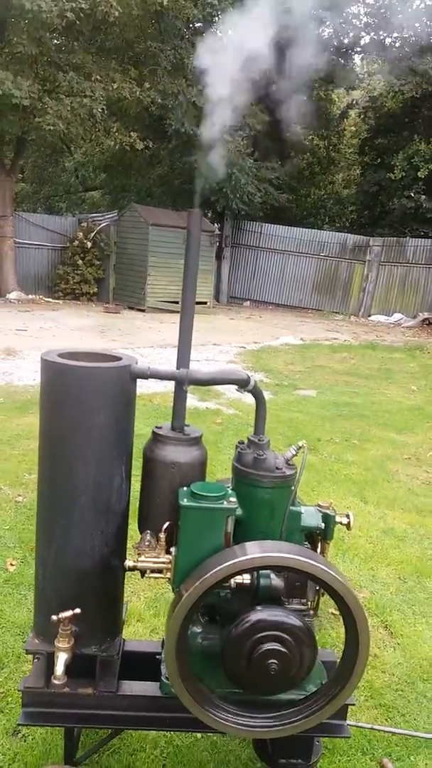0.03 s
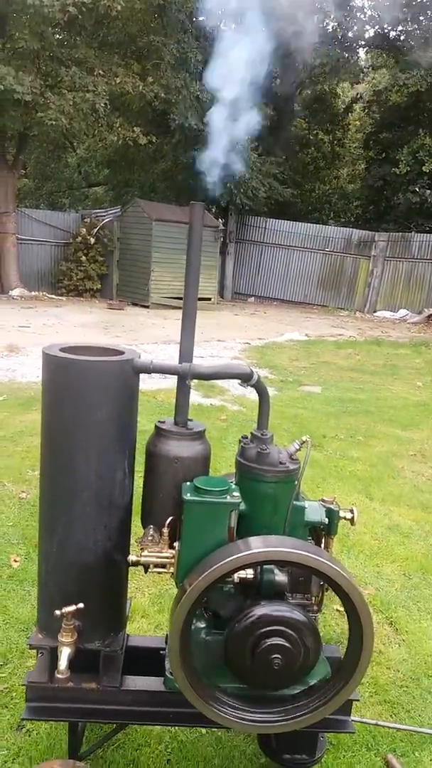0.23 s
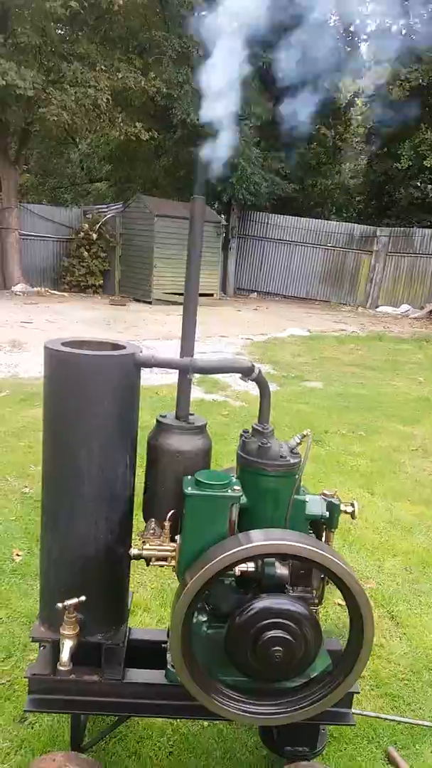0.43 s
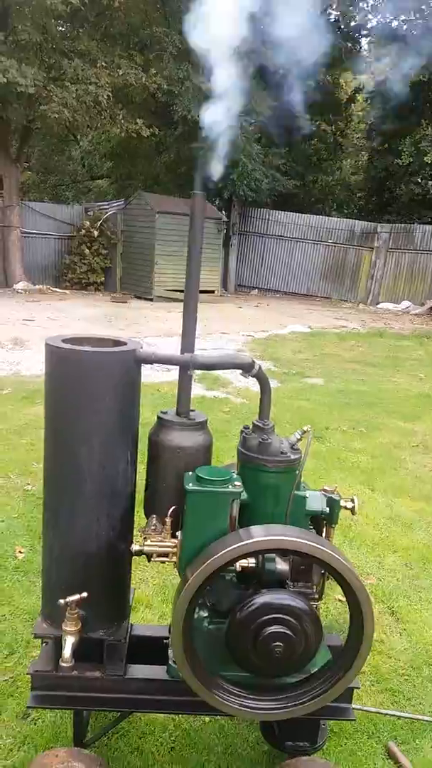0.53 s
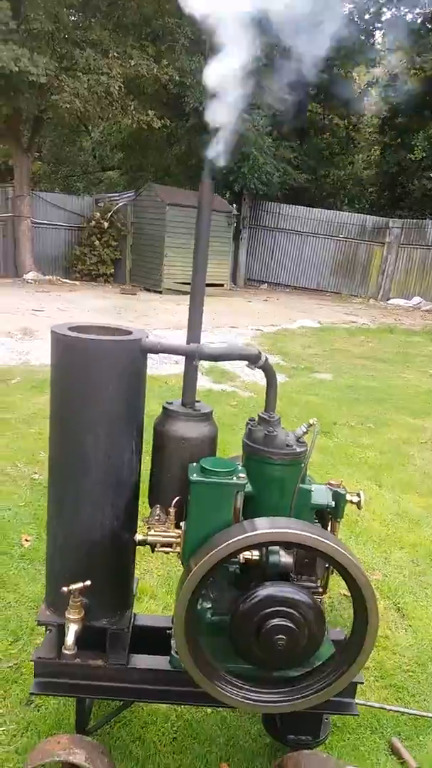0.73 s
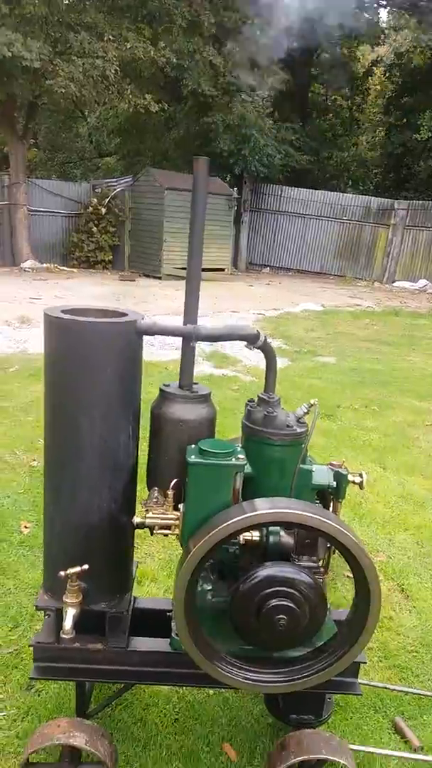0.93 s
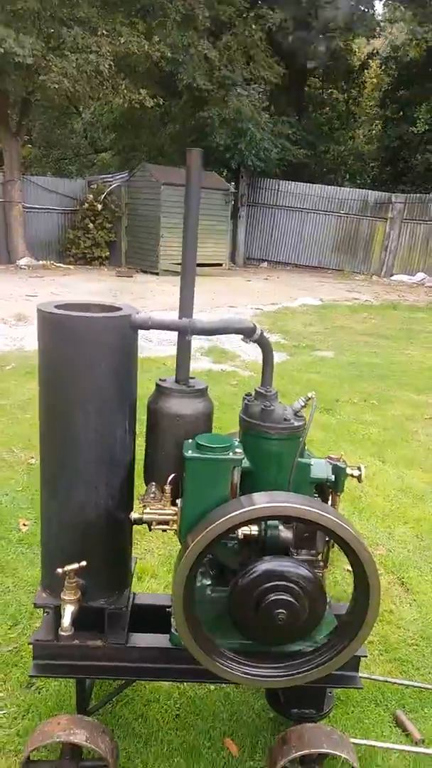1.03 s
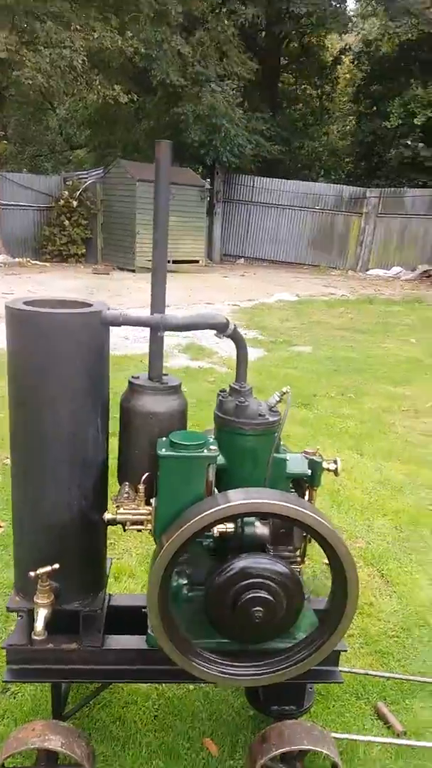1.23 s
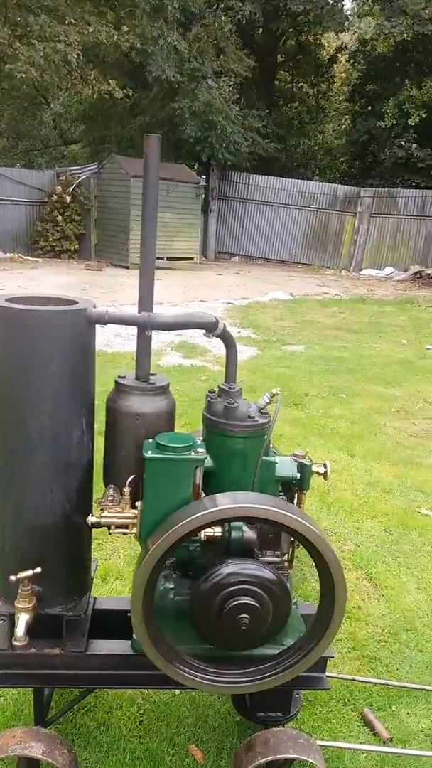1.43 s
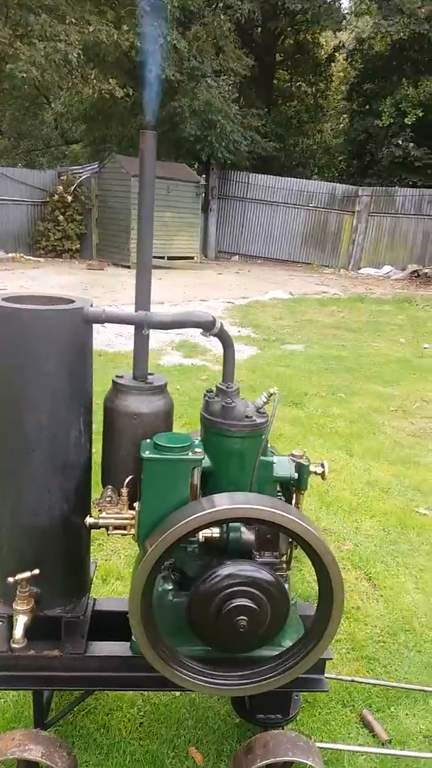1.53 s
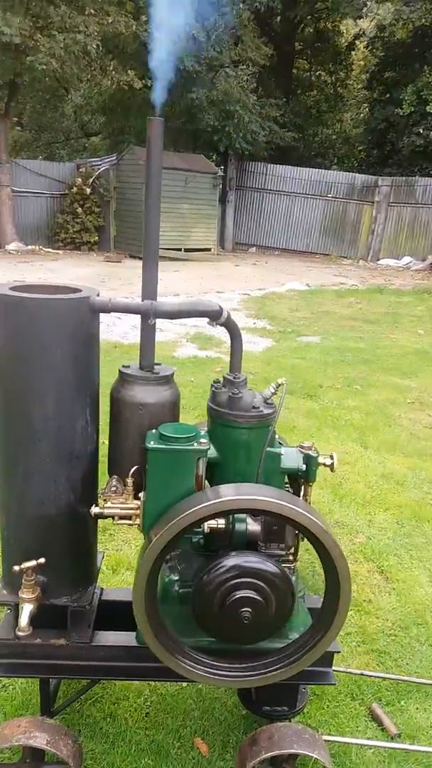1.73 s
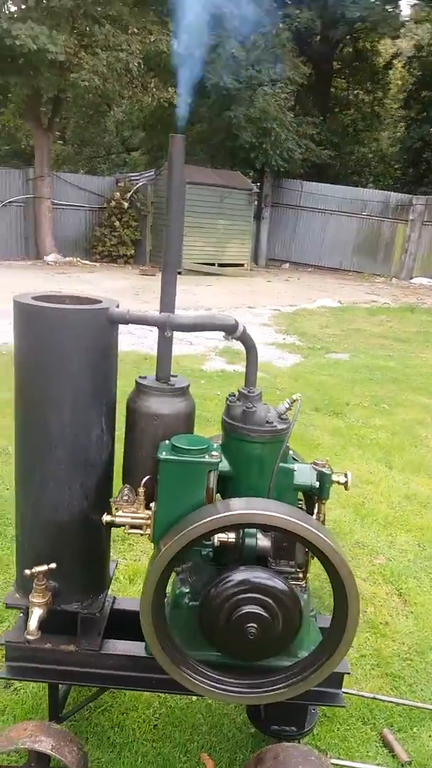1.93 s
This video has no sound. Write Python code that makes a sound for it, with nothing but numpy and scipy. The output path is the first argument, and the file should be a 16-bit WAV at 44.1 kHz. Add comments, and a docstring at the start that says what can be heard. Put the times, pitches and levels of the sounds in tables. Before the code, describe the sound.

A small old stationary engine runs outdoors, popping steadily about ten times a second with breathy intake hiss, iron knocks and low rumble. Sharp hissing exhaust chuffs come at 0.27 and 0.37 seconds. Around 1.0 a rough blast swells into a loud, clipped boom with a short yard echo. Afterwards everything is quieter; firings thud and whistle near 1.2, 1.4, 1.7, 1.8 and 1.9.

```python
"""A small two-stroke stationary engine idles on a lawn at about ten turns a second.
From the first turn, pressure pulses pop, shaped noise sucks at the intake and ringing noise rattles the iron.
Some turns then fire: low modes thud, a gliding tone sounds the stack, and rough noise chuffs and whistles.
Just before one second, unburnt fuel goes off in the silencer: a noise swell, a ringing boom, a yard echo.
After the bang the recorder's gain control stays turned down."""
import sys
import numpy as np
from scipy import signal
from scipy.fft import rfft, irfft
from scipy.io import wavfile
from scipy.ndimage import uniform_filter1d

SR = 44100
rng = np.random.default_rng(int(sys.argv[2]) if len(sys.argv) > 2 else 0)


def pcm_store(signal):
    """Save signal as 16-bit PCM."""
    levels = np.round(np.clip(np.atleast_2d(signal), -1, 1) * 32767)
    wavfile.write(sys.argv[1], SR, levels.astype(np.int16).T)


N = 88200
T = np.arange(N) / SR

# Turns of the crank: [t/s, intake pop level/dB]
TURNS = [(.0193,-14),(0.1208,-17.5),(.2221,-13),(.3227,-14.5),(.422,-14),(.522,-11.5),(0.6232,-14),(0.7242,-11.5),(0.8266,-10.5),(.9291,-10),
         (1.0267,-7),(1.1418,-11.5),(1.2389,-9.5),(1.3429,-10),(1.4504,-26),(1.5508,-13),(1.6549,-12.5),(1.7633,-10.5),(1.862,-10.5),(1.962,-10.5)]
# Pressure pulses within one turn: [t/s from the turn, f/Hz, level/dB relative to the turn's pop]
INTAKE_PULSES = [(-.008,424,-4),(0,620,3.3),(0.0263,450,-8)]
# Colour of the air drawn in: [f/Hz, relative level/dB]
INTAKE_HISS_COLOUR = [(200,2),(1000,3),(2000,-6.5),(3000,1),(4200,-6),(5400,-1),(7000,-8.5),(10000,-15),(16000,-24.5)]
THUMP_HZ, THUMP_DB = 96, -19.5  # level relative to the turn's pop
HISS_DB, HISS_LEAD_S = -25.5, 0.0086
HISS_RISE_S, HISS_HOLD_S, HISS_DECAY_S = 0.0092, 0.0086, 0.006


def intake():
    """Pressure pulses, each with a low thump, pop on every turn as air hisses through the carburettor."""
    pops, draw = np.zeros(N), np.zeros(N)
    for turn_s, pop_db in TURNS:
        for delay, hz, db in INTAKE_PULSES:
            at = turn_s + delay
            pop = amp(db) * pulse(at, hz)
            thump = amp(THUMP_DB) * pulse(at, THUMP_HZ)
            pops += amp(pop_db) * (pop + thump)
        draw += amp(HISS_DB) * burst(turn_s - HISS_LEAD_S, HISS_RISE_S, HISS_HOLD_S, HISS_DECAY_S)
    return pops + draw * noise(INTAKE_HISS_COLOUR)


# Firings: [t/s, thud level/dB, gas level/dB, hot pipe tone f/Hz, pipe tone level/dB,
#           after-ring level/dB, top hiss level/dB relative to the gas]
FIRINGS = [(0.2694,-10.5,-17.5,1140,-40,-22,14),(0.3697,-12,-14.5,1077,-22,-29,6.5),(0.981,-16.5,-19,960,-30,-45,-11),(1.1857,-13.5,-18,1467,-14,-33,-3),(1.3946,-7,-10,1163,-15.5,-31,-23),
           (1.415,-13,-25,1290,-17.5,-46,-18),(1.7072,-6.5,-13.5,1086,-13,-50,-3),(1.809,-12.5,-19,1130,-16.5,-32,-15),(1.910,-12.5,-18,1183,-12.5,-28,-5)]
# Colour of the escaping gas: [f/Hz, relative level/dB]
GAS_COLOUR = [(500,-16),(3700,-6.5),(4800,-3),(5700,4),(6600,-3),(8000,-12.5),(11000,-19.5),(16000,-34)]
# Colour of the fuller rush of gas, also used in the boom: [f/Hz, relative level/dB]
RUSH_COLOUR = [(60,0.5),(150,4),(650,1.5),(1000,-2),(2400,-3),(3500,-7.5),(8000,-25)]
# Ringing of the stack, also excited by the backfire: [f/Hz, t60/s, relative level/dB]
STACK_MODES = [(2535,0.2,-20),(2947,0.3,-25),(4870,0.05,-16.5),(6930,0.05,-15)]
EXHAUST_LAG_S, IDLE_PUFF_DB = 0.044, -27.5
GAS_RISE_S, GAS_HOLD_S, GAS_DECAY_S = 0.0028, 0.0064, 0.0056
RUSH_DB, RUSH_DECAY_S = -21.5, 0.011
AFTER_HZ, AFTER_LAG_S, AFTER_DECAY_S = 1880, 0.009, 0.008
TOP_HISS_HZ = 9000


def exhaust():
    """Each firing thuds, sounds the pipe, sputters out gas and leaves a ring; every turn pumps a soft puff."""
    low = sum(amp(IDLE_PUFF_DB) * thud(turn_s + EXHAUST_LAG_S) for turn_s, _ in TURNS)
    gas, rush, jet = noise(GAS_COLOUR), noise(RUSH_COLOUR), np.zeros(N)
    high_pass = signal.butter(4, TOP_HISS_HZ, "high", fs=SR, output="sos")
    top = signal.sosfilt(high_pass, noise(GAS_COLOUR))
    for at, thud_db, gas_db, hot_hz, tone_db, after_db, top_db in FIRINGS:
        low += amp(thud_db) * thud(at)
        low += amp(tone_db) * pipe_tone(at, hot_hz)
        # one lag sets the delay, rise and hold of the after-ring
        after_swell = burst(at + AFTER_LAG_S, AFTER_LAG_S, AFTER_LAG_S, AFTER_DECAY_S)
        low += amp(after_db) * after_swell * tone(AFTER_HZ)
        gas_swell = burst(at, GAS_RISE_S, GAS_HOLD_S, GAS_DECAY_S)
        jet += amp(gas_db) * (gas + amp(top_db) * top) * gas_swell
        jet += amp(RUSH_DB) * rush * burst(at, GAS_RISE_S, GAS_HOLD_S, RUSH_DECAY_S)
    return low + body(jet * sputter(), STACK_MODES)


# Air in the silencer: [f/Hz, t60/s, relative level/dB]
SILENCER_MODES = [(146,0.028,0),(77,0.039,-6.5)]


def thud(start):
    """A slug of gas rocks the air in the silencer."""
    return sum(amp(db) * ring(hz, t60, start) for hz, t60, db in SILENCER_MODES)


PIPE_COLD_HZ, PIPE_COOL_S, PIPE_OCTAVE_DB, PIPE_DECAY_S = 1022, .04, -10.5, 0.0092


def pipe_tone(at, hot_hz):
    """The stack sounds with its octave, gliding from its hot pitch to the cold one as the gas cools."""
    cooling = np.exp(-np.maximum(T - at, 0) / PIPE_COOL_S)
    hz = PIPE_COLD_HZ + (hot_hz - PIPE_COLD_HZ) * cooling
    swell = burst(at - .002, 0.0025, 0.0058, PIPE_DECAY_S)
    return swell * (tone(hz) + amp(PIPE_OCTAVE_DB) * tone(2 * hz))


# Short whistles at the exhaust port: [t/s, f/Hz, level/dB]
WHISTLES = [(0.268,4935,-15),(0.27,4430,-18),(0.376,4830,-16),(.582,5450,-25.5),(0.683,5450,-22.5),(1.301,5340,-26),(1.395,5620,-11.5),(1.707,6900,-15),(1.814,5430,-11),(1.913,5410,-14)]
WHISTLE_RISE_S, WHISTLE_HOLD_S, WHISTLE_DECAY_S = 0.0048, 0.0013, 0.0047


def whistles():
    """Gas squeezes through the exhaust port with a brief bright ping."""
    pings = np.zeros(N)
    for at, hz, db in WHISTLES:
        pings += amp(db) * burst(at, WHISTLE_RISE_S, WHISTLE_HOLD_S, WHISTLE_DECAY_S) * tone(hz)
    return pings


# Colour of the blast: [f/Hz, relative level/dB]
BANG_COLOUR = [(60,-3),(650,-4),(1000,2),(2500,-4.5),(5300,9.5),(11000,-8.5),(16000,-17)]
# Colour of the bang's echo: [f/Hz, relative level/dB]
ECHO_COLOUR = [(60,-4.5),(1800,-4.5),(5300,0.5),(8000,-8),(16000,-27.5)]
# What the boom sets ringing in the silencer: [f/Hz, t60/s, level/dB relative to the boom]
BOOM_MODES = [(175, .05, -11), (660, .045, -6.5)]
BANG_S, BANG_DB, BANG_RISE_S, BANG_HOLD_S, BANG_DECAY_S = 0.99, -6, 0.017, 0.006, 0.0024
BOOM_S, BOOM_DB = 1.009, -2
ECHO_DB, ECHO_HOLD_S, ECHO_DECAY_S = -7, 0.021, 0.049


def backfire():
    """A rough blast swells in the stack, ends in a boom and scatters back from the fence and trees."""
    swell = burst(BANG_S, BANG_RISE_S, BANG_HOLD_S, BANG_DECAY_S)
    blast = amp(BANG_DB) * noise(BANG_COLOUR) * sputter() * swell
    hollow = sum(amp(db) * ring(hz, t60, BOOM_S) for hz, t60, db in BOOM_MODES)
    slam = noise(RUSH_COLOUR) * burst(BOOM_S, 0.00077, 0.0047, 0.003)
    boom = amp(BOOM_DB) * (slam + hollow)
    first_return = burst(1.014, 0.002, ECHO_HOLD_S, ECHO_DECAY_S)
    late_return = amp(-10.5) * burst(1.05, 0.032, 0.02, 0.017)
    echo = amp(ECHO_DB) * noise(ECHO_COLOUR) * (first_return + late_return)
    return body(blast + boom + echo, STACK_MODES)


# Knocks of loose metal: [t/s, level/dB]
KNOCKS = [(.044,-29.5),(0.063,-22),(0.148,-27.5),(.166,-26),(0.186,-20.5),(0.247,-25),(0.452,-25.5),(0.472,-23),(0.489,-25),(0.574,-26),(.586,-24.5),
          (.672,-20.5),(.686,-21),(.754,-25),(.772,-28),(0.79,-22.5),(0.857,-22.5),(0.879,-24),(0.895,-24),(1.304,-24),(1.583,-27)]
# Colour of contact on the iron: [f/Hz, relative level/dB]
IRON_COLOUR = [(150,3.5),(600,-8.5),(1150,6.5),(1900,-8.5),(3000,1),(4100,-8),(5600,3),(6400,-10),(7500,-24),(16000,-40)]
# Ringing of the iron casing: [f/Hz, t60/s, relative level/dB]
IRON_MODES = [(1156,0.094,-17.5),(2838,0.046,-16.5),(5476,0.03,-19.5)]
KNOCK_RISE_S, KNOCK_HOLD_S, KNOCK_DECAY_S = 0.0004, 0.0017, 0.0039
KNOCK_COLOUR_DB = 2  # random spread of each colour point
CHATTER_DB, CHATTER_SPREAD_DB, CHATTER_PER_S = -35.5, 3, 86


def knocks():
    """Slack moving parts knock the iron casing, each blow its own colour, over random lighter chatter."""
    is_tap = rng.random(N) < CHATTER_PER_S / SR
    taps = is_tap * amp(CHATTER_DB + CHATTER_SPREAD_DB * rng.standard_normal(N))
    tap_shape = burst(0, KNOCK_RISE_S, KNOCK_HOLD_S, KNOCK_DECAY_S)
    contact = through(taps, tap_shape) * noise(IRON_COLOUR)
    for at, db in KNOCKS:
        colour = [(hz, iron_db + KNOCK_COLOUR_DB * rng.standard_normal()) for hz, iron_db in IRON_COLOUR]
        contact += amp(db) * burst(at, KNOCK_RISE_S, KNOCK_HOLD_S, KNOCK_DECAY_S) * noise(colour)
    return body(contact, IRON_MODES)


# Colour of the churning bearings and gears: [f/Hz, relative level/dB]
RUMBLE_COLOUR = [(40,-34),(75,2),(120,7),(260,-12),(1150,2),(1800,-5.5),(5500,-21),(7000,-29),(16000,-41)]
RUMBLE_DB = -34.5


def running_gear():
    """Bearings and gears churn as steady coloured noise."""
    return amp(RUMBLE_DB) * noise(RUMBLE_COLOUR)


# Hard reflection in the yard: [t/s delay, level/dB]
REFLECTIONS = [(.027,-15)]
# Colour of the outdoor tail: [f/Hz, relative level/dB]
YARD_COLOUR = [(100,-4),(9000,-0.5),(16000,-12)]
YARD_DB, YARD_T60_S = -14.5, 0.5


def yard(x):
    """One hard reflection and a thin, decaying noise tail join the direct sound."""
    tail = noise(YARD_COLOUR) * burst(0.0028, 0.0063, 0, YARD_T60_S / np.log(1000))
    response = amp(YARD_DB) * tail / np.linalg.norm(tail)
    for delay, db in REFLECTIONS:
        response[int(delay * SR)] += amp(db)
    return x + through(x, response)


def amp(db):
    """Decibels to gain."""
    return 10 ** (np.asarray(db) / 20)


def unit(x):
    """Scale to a standard deviation of 1."""
    return x / np.std(x)


def noise(colour):
    """Noise of rms 1 with a spectrum of (f/Hz, level/dB) points joined over log frequency."""
    hz, db = np.array(colour, float).T
    f = np.maximum(np.arange(N // 2 + 1) * SR / N, 1)
    gain = amp(np.interp(np.log(f), np.log(hz), db))
    return unit(irfft(rfft(rng.standard_normal(N)) * gain, N))


def burst(start, rise, hold, decay):
    """Linear attack, hold and exponential release."""
    age = T - start
    return np.clip(age / rise, 0, 1) * np.exp(-np.maximum(age - rise - hold, 0) / decay)


def pulse(at, hz):
    """A single dip of pressure with a small overshoot on each side."""
    u = np.minimum((np.pi * hz * (T - at)) ** 2, 20)
    return (2 * u - 1) * np.exp(-u)


def ring(hz, t60, start=0):
    """One struck mode: a sine that dies by 60 dB in t60 seconds."""
    age = np.maximum(T - start, 0)
    return np.sin(2 * np.pi * hz * age) * np.exp(-np.log(1000) * age / t60)


def through(x, response):
    """Pass a sound through an impulse response."""
    return signal.fftconvolve(x, response)[:N]


def body(x, modes):
    """A sound plus the metal modes that it sets ringing."""
    response = np.zeros(N)
    for hz, t60, db in modes:
        mode = ring(hz, t60)
        response += amp(db) * mode / np.linalg.norm(mode)
    return x + through(x, response / 2)


def flutter():
    """Fast random unsteadiness of spread 1, smoothed over a few milliseconds."""
    smooth = uniform_filter1d(rng.standard_normal(N), size=130)
    return unit(uniform_filter1d(smooth, size=130))


WAVER_RAD = .75  # spread of the phase


def tone(hz):
    """A gas-driven tone, steady or gliding, whose phase wavers."""
    phase = 2 * np.pi * np.cumsum(hz * np.ones(N)) / SR
    return np.sin(phase + WAVER_RAD * flutter())


SPUTTER_DB = 2  # spread of the level


def sputter():
    """Turbulence roughens a flow every few milliseconds, as a gain of rms 1."""
    gain = amp(SPUTTER_DB * flutter())
    return gain / np.sqrt(np.mean(gain ** 2))


def scene():
    """The engine in its yard."""
    engine = intake() + knocks() + running_gear() + exhaust() + whistles() + backfire()
    return yard(engine)[None]


AGC_TOP_DB, AGC_CREEP_DB_PER_S, AGC_ATTACK_S = -11.5, 3, 0.0059
BASS_CUT_HZ, TOP_CUT_HZ = 48, 15900


def record(dry):
    """A bass cut, gain control that ducks fast and never recovers, overload and a steep top cut."""
    x = signal.sosfilt(signal.butter(6, BASS_CUT_HZ, "high", fs=SR, output="sos"), dry[0])
    # mean power over the last 10 ms
    power = uniform_filter1d(x ** 2, size=441, origin=220)
    level_db = 10 * np.log10(np.abs(power) + 1e-12)
    # the held peak creeps upward, so the gain keeps sinking slowly once it ducks
    creep = AGC_CREEP_DB_PER_S * T
    held_db = np.maximum.accumulate(level_db - creep) + creep
    excess_db = np.maximum(held_db - AGC_TOP_DB, 0)
    keep = np.exp(-1 / (AGC_ATTACK_S * SR))
    duck_db = signal.lfilter([1 - keep], [1, -keep], excess_db)
    x = np.clip(x * amp(-duck_db), -.9, .9)
    return signal.sosfilt(signal.ellip(10, .1, 80, TOP_CUT_HZ, fs=SR, output="sos"), x)[None]


dry = scene()
out = record(dry)
pcm_store(out)
```